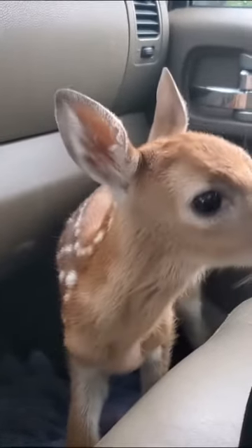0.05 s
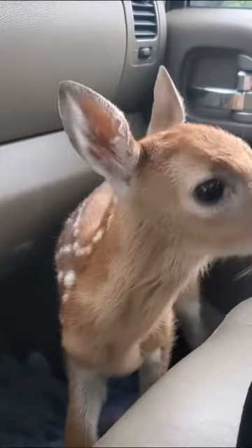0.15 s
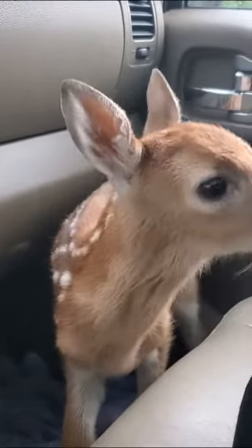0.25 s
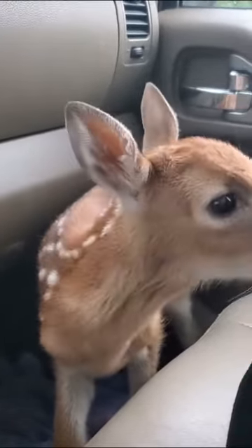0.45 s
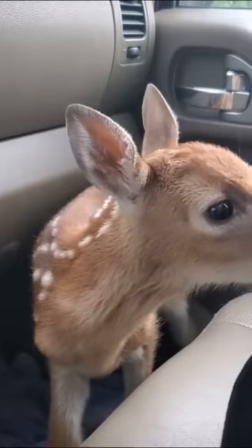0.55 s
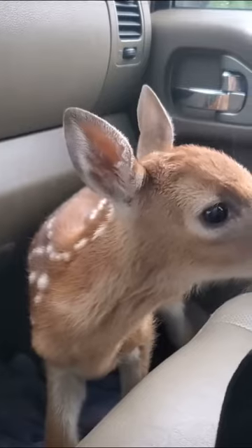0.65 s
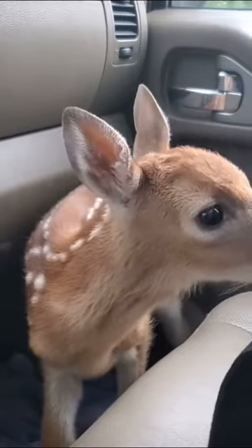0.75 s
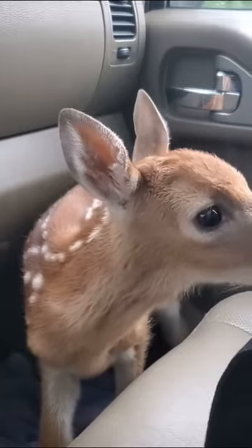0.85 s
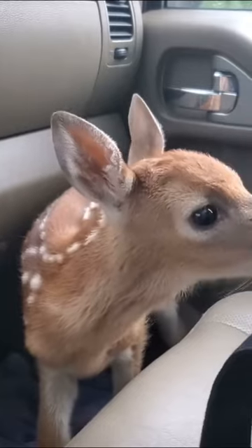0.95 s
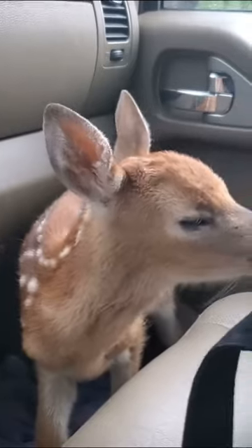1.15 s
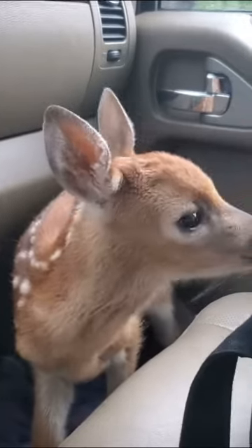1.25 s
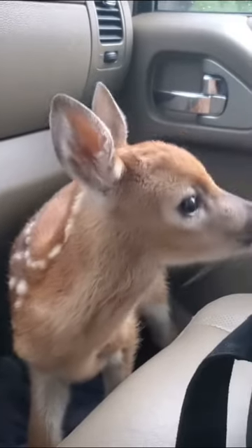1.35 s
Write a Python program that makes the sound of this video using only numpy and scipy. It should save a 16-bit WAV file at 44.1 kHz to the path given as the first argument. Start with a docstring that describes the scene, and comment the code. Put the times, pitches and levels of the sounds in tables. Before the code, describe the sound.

A fawn bleats once, close by, over a faint low rumble inside a car.

```python
"""A fawn bleats once, close by, inside a car.
Its vocal folds send a pulse train through the resonances of throat and nose (source and filter).
The nasal call rises, holds and sags: a clear tone with a raspy start and a hoarse end.
The padded cabin rings briefly. Underneath lie a low rumble and a soft hiss,
both quieter once the call has begun, and a few brief, soft swells of hiss."""
import sys
import numpy as np
from scipy import signal
from scipy.fft import rfft, irfft, next_fast_len
from scipy.io import wavfile
from scipy.ndimage import uniform_filter1d, minimum_filter1d

SR = 44100
rng = np.random.default_rng(int(sys.argv[2]) if len(sys.argv) > 2 else 0)


def master_out(mix):
    """Clip the mix to full scale and print it as 16-bit PCM to the path in sys.argv[1]."""
    frames = np.transpose(np.atleast_2d(mix))
    ceiling = np.clip(frames, -1, 1)
    pcm = np.round(ceiling * 32767).astype(np.int16)
    wavfile.write(sys.argv[1], SR, pcm)


N = 61739
TIME_S = np.arange(N) / SR
FFT_SIZE = 2 * next_fast_len(N)
FREQ_HZ = np.fft.rfftfreq(FFT_SIZE, 1 / SR)


def from_db(db):
    """Amplitude ratio: a factor of ten per 20 dB."""
    return 10 ** (np.asarray(db) / 20)


def unit_rms(x):
    """Normalisation to unit mean power."""
    return x / np.sqrt(np.mean(x ** 2) + 1e-20)


def over_time(rows):
    """Linear interpolation of a control curve at every sample."""
    return np.interp(TIME_S, *np.transpose(rows))


def over_frequency(rows, column=1):
    """Interpolation of one column on a log-frequency axis."""
    rows = np.array(rows)
    return np.interp(np.log(FREQ_HZ + 1), np.log(rows[:, 0]), rows[:, column])


def filtered(x, response):
    """Linear filtering: the spectrum is multiplied by a frequency response."""
    return irfft(rfft(x, FFT_SIZE) * response)[..., :N]


def lowpass(hz, order):
    """Zero-phase low-pass response, at half amplitude at the cutoff."""
    return 1 / (1 + (FREQ_HZ / hz) ** order)


def stereo_noise(spectrum, correlation):
    """Coloured noise of unit rms; the balance of mid and side sets the left-right correlation."""
    mid, side = rng.standard_normal((2, N))
    gain = from_db(over_frequency(spectrum))
    mid = filtered(mid, gain * np.sqrt(1 + correlation))
    side = filtered(side, gain * np.sqrt(1 - correlation))
    return unit_rms(np.array([mid + side, mid - side]))


def swells(rows):
    """An amplitude envelope of superposed Gaussian bumps."""
    return sum(from_db(db) * np.exp(-.5 * ((TIME_S - centre_s) / half_width_s) ** 2)
               for centre_s, half_width_s, db in rows)


# Spectrum of the rumble: frequency_hz, relative_density_db
RUMBLE_SPECTRUM = [(15, -29), (27, -8.5), (42, 0), (60, 4), (82, 1), (112, 0), (135, -6.5), (175, -25.5),
                   (300, -54.5)]
# Envelope of the rumble: time_s, level_db
RUMBLE_ENVELOPE = [(0, -29), (.21, -34.5), (.27, -41), (.45, -45), (.58, -41.5), (.72, -41), (.86, -43),
                   (.92, -39.5), (1.02, -39), (1.25, -43), (1.4, -37)]
# Brief surges added to that envelope: centre_s, half_width_s, level_db
RUMBLE_SURGES = [(.595, 0.014, -40.5), (.818, 0.0071, -38)]


def car_rumble(side_db=-26.5):
    """Amplitude-modulated low-frequency noise, almost fully correlated between the sides."""
    noise = stereo_noise(RUMBLE_SPECTRUM, correlation=1 - 2 * from_db(side_db) ** 2)
    return noise * (from_db(over_time(RUMBLE_ENVELOPE)) + swells(RUMBLE_SURGES))


# Spectrum of the hiss: frequency_hz, relative_density_db
HISS_SPECTRUM = [(60, -21), (160, -6), (270, -1), (420, -6), (700, -5.5), (1200, -6.5), (2000, -13.5),
                 (3500, -20), (6200, -23), (7300, -44), (10000, -35), (15500, -26.5)]
# Envelope of the hiss: time_s, level_db
HISS_ENVELOPE = [(0, -39.5), (.04, -40), (.14, -42.5), (.2, -42), (.3, -53), (.58, -52), (.68, -51.5),
                 (.8, -48), (.88, -51.5), (1.0, -50), (1.18, -50.5), (1.28, -51.5), (1.32, -49.5),
                 (1.4, -50)]
# Likeness of left and right: frequency_hz, coherence
HISS_COHERENCE = [(150, .85), (500, 0.61), (1500, 0.39), (5000, 0.18), (8000, 0.53), (14000, .2)]


def hiss(right_delay_s=0.000335):
    """Partly coherent broadband noise with a time difference: it reaches the right side later."""
    noise = stereo_noise(HISS_SPECTRUM, over_frequency(HISS_COHERENCE))
    left, right = noise * from_db(over_time(HISS_ENVELOPE))
    return np.array([left, filtered(right, np.exp(-2j * np.pi * FREQ_HZ * right_delay_s))])


# Brief soft swells of hiss: centre_s, half_width_s, level_db
HISS_SWELLS = [(0.202, 0.016, -38), (.615, .025, -56.5), (0.737, 0.018, -55.5), (0.829, 0.0077, -52.5),
               (0.988, 0.021, -54.5), (1.08, 0.0094, -53), (1.311, 0.0054, -52.5), (1.382, 0.012, -63)]
# Spectrum of the swells: frequency_hz, relative_density_db
HISS_SWELL_SPECTRUM = [(200, -27), (700, -4.5), (1250, -1), (3000, -10), (6200, -16), (7500, -25.5),
                       (15000, -21)]


def hiss_swells():
    """Broadband noise, amplitude-modulated into brief soft swells."""
    return swells(HISS_SWELLS) * stereo_noise(HISS_SWELL_SPECTRUM, correlation=.25)


def diffuse_field(x, t60_s):
    """Convolution with exponentially decaying random echoes, independent on each side."""
    onset = np.clip(TIME_S / 0.01, 0, 1)
    echoes = rng.standard_normal((2, N)) * from_db(-60 * TIME_S / t60_s) * onset
    return signal.fftconvolve(x, unit_rms(echoes) / np.sqrt(N), axes=1)[:, :N]


def cabin_reverberation(x, left_db=-13, right_db=-12, tail_db=-19.5, tail_treble_db=12):
    """Absorption by the padding keeps the ring short; a faint, brighter tail outlasts it."""
    ring = from_db([[left_db], [right_db]]) * diffuse_field(x, t60_s=0.1)
    treble_shelf = from_db(tail_db + tail_treble_db * (1 - lowpass(6000, order=8)))
    return ring + diffuse_field(filtered(x, treble_shelf), t60_s=0.28)


def drift(rate_hz, order=2):
    """Random modulation: low-passed noise of unit rms, smoother at a higher order."""
    return unit_rms(filtered(rng.standard_normal(N), lowpass(rate_hz, order)))


def pulse_train(phase, dispersion_rad=0.019, flutter_hz=25):
    """Harmonic series whose partials flutter in level independently, the high ones most."""
    pulses = np.zeros(N)
    for k in range(1, 40):
        depth_db = np.interp(k, [9, 18], [2.5, 9])
        flutter = from_db(depth_db * np.tanh(drift(flutter_hz, order=8)))
        pulses += flutter * np.cos(k * phase + dispersion_rad * k ** 2)  # dispersion softens each pulse
    return pulses


# Fundamental of the bleat: time_s, pitch_hz
BLEAT_PITCH = [(.205, 388), (.217, 402), (.233, 428), (.245, 443), (.268, 460), (.299, 465), (.341, 461),
               (.381, 467.3), (.405, 462), (.425, 452.5), (.467, 444), (.483, 436), (.499, 420),
               (.519, 382), (.533, 338), (.56, 300)]
# Source strength at the folds: time_s, gain_db
BLEAT_EFFORT = [(.2, -38), (.212, -20.5), (.224, -10), (.234, -0.5), (.26, -3), (.305, -2), (.345, -1.5),
                (.385, 0), (.425, -3.5), (.468, -2.5), (.48, -4.5), (.51, -9.5), (.542, -14), (.558, -21),
                (.59, -54)]
# Hoarseness, from 0 (clear) to 1 (noise): time_s, roughness
BLEAT_ROUGHNESS = [(.205, .6), (.228, .22), (.255, .11), (.285, .012), (.4, .01), (.465, .03), (.495, .17),
                   (.525, .5), (.555, .9)]


def vocal_folds(steady_jitter=.0006, rough_jitter=0.0438, shimmer_db=3, unsteady_hz=241):
    """Glottal source: jitter (of pitch), shimmer (of level) and pulsed noise grow with hoarseness."""
    roughness = over_time(BLEAT_ROUGHNESS)
    jitter = (steady_jitter + rough_jitter * roughness) * drift(unsteady_hz)
    pitch_hz = over_time(BLEAT_PITCH) * (1 + jitter)
    phase = 2 * np.pi * np.cumsum(pitch_hz) / SR
    pulses = pulse_train(phase)
    shimmer = from_db(shimmer_db * roughness * np.tanh(drift(unsteady_hz)))
    tone = pulses * shimmer * np.sqrt(1 - roughness ** 2)
    # One puff of noise per cycle, scaled to the power density of the harmonics.
    puffs = unit_rms(rng.standard_normal(N) * (1 + np.cos(phase))) * np.sqrt(SR / pitch_hz) / 2
    rasp = from_db(-4) * roughness * puffs
    high_rasp = from_db(-7) * filtered(puffs, 1 - lowpass(9000, order=12))
    calling = (TIME_S > BLEAT_EFFORT[0][0]) & (TIME_S < BLEAT_EFFORT[-1][0])
    return (tone + rasp + high_rasp) * from_db(over_time(BLEAT_EFFORT)) * calling


def resonator(x, centre_hz, bandwidth_hz):
    """A damped resonance of unit peak gain whose centre may move."""
    carrier = np.exp(2j * np.pi * np.cumsum(centre_hz) / SR)
    pole = np.exp(-np.pi * bandwidth_hz / SR)
    return 2 * np.real(carrier * signal.lfilter([1 - pole], [1, -pole], x / carrier + 1e-18))


def minimum_phase(gain_db):
    """The causal response with these gains: it rings only after each pulse."""
    cepstrum = irfft(np.log(from_db(gain_db)))
    half = len(cepstrum) // 2
    return np.exp(rfft(np.r_[cepstrum[0], 2 * cepstrum[1:half]], 2 * half))


# Formant centres as the mouth opens and closes: time_s, low_hz, middle_hz, high_hz
FORMANT_PATHS = [(.222, 1230, 2480, 4320), (0.239, 1360, 2610, 4450), (.245, 1330, 2965, 4220),
                 (.268, 1362, 3224, 4190), (.4, 1455, 3170, 4100), (.465, 1414, 3115, 4073),
                 (0.502, 1460, 3125, 4060), (.55, 1380, 2986, 4050)]
# Low, middle and high formant: bandwidth_hz, gain_db
FORMANT_SHAPES = [(142, 9.5), (230, 13.5), (210, 10)]


def formants(voice):
    """Three moving resonances of the vocal tract in cascade, each added to its own input."""
    times_s, *paths_hz = np.transpose(FORMANT_PATHS)
    for path_hz, (bandwidth_hz, gain_db) in zip(paths_hz, FORMANT_SHAPES):
        centre_hz = over_time(np.c_[times_s, path_hz])
        voice = voice + from_db(gain_db) * resonator(voice, centre_hz, bandwidth_hz)
    return voice


# Broad filter of throat and nose: frequency_hz, left_gain_db, right_minus_left_db
TRACT_RESPONSE = [(200, -37, -22), (480.4, -47, -14), (667, -37.5, -1), (925, -32.5, -1), (1060, -37, -16),
                  (1416, -27, -7), (1700, -33.5, -4), (2150, -33, -3.5), (2938, -28, -2.5), (2770, -26, 3),
                  (3196, -26.5, -11), (3400, -30, 2.5), (4120, -26.5, -13), (4686, -37, 4.5),
                  (4692, -43, -5.5), (5570, -39.5, -0.5), (6400, -44, -1), (6520, -37.5, -18.5),
                  (7310, -61.5, -17), (8190, -46, -24), (8100, -60, -3.5), (10100, -60.5, 0.5),
                  (12000, -68, -1), (13500, -57.5, -13), (15500, -57.5, -27)]
# Emphasis of the band around the lowest formant: time_s, gain_db
LOW_FORMANT_GAIN = [(.21, 13), (.235, 8), (.305, 6), (.325, 1.5), (.348, 0.5), (.383, 6.5), (.42, 1),
                    (.475, 0.5), (.5, 1), (.54, 5.5)]
# Emphasis of the treble around 5 kHz: time_s, gain_db
TREBLE_GAIN = [(.224, 14), (.262, 14), (.274, 1), (.32, 3), (.35, -3), (.404, -3), (.42, 12), (.47, 13),
               (.484, 2), (.55, 0)]
# Phase difference between the sides: frequency_hz, left_lead_rad
PHASE_LEAD = [(460, 1.5), (925, 0.68), (1385, -1.5), (1850, -0.54), (2300, -2), (2780, -2), (3230, 0.84),
              (3700, 3), (4150, -1.45), (4650, -0.16), (6000, 2.42), (15000, 0.37)]


def fawn_bleat():
    """Source and filter: throat and nose shape the pulses. The head is to the left, the louder side."""
    voice = formants(vocal_folds())
    voice = filtered(voice, minimum_phase(over_frequency(TRACT_RESPONSE)))
    low_band = filtered(voice, lowpass(1480, order=16) * (1 - lowpass(1000, order=8)))
    treble_band = filtered(voice, lowpass(5750, order=40) * (1 - lowpass(4800, order=60)))
    left = voice + low_band * (from_db(over_time(LOW_FORMANT_GAIN)) - 1)
    left += treble_band * (from_db(over_time(TREBLE_GAIN)) - 1)
    right_gain = from_db(over_frequency(TRACT_RESPONSE, column=2))
    right_lag = np.exp(-1j * over_frequency(PHASE_LEAD))
    return np.array([left, filtered(left, right_gain * right_lag)])


def scene():
    """Superposition of the direct bleat, its reverberation and the background."""
    bleat = fawn_bleat()
    return bleat + cabin_reverberation(bleat) + car_rumble() + hiss() + hiss_swells()


def record(dry, threshold=.85, window_s=.012, cutoff_hz=15800):
    """Peak limiting by a smoothed gain, then band limiting by a steep low-pass."""
    span = int(window_s * SR)
    allowed_gain = threshold / np.maximum(np.abs(dry).max(axis=0), threshold)
    gain = uniform_filter1d(minimum_filter1d(allowed_gain, span), span)
    return filtered(dry * gain, lowpass(cutoff_hz, order=300))


dry = scene()
out = record(dry)
master_out(out)
```